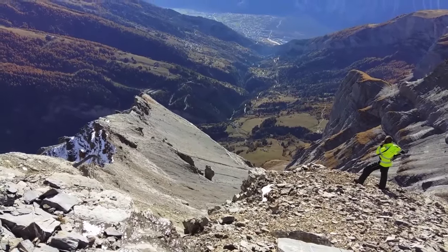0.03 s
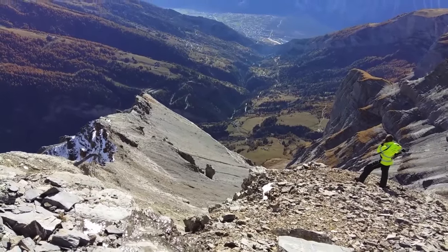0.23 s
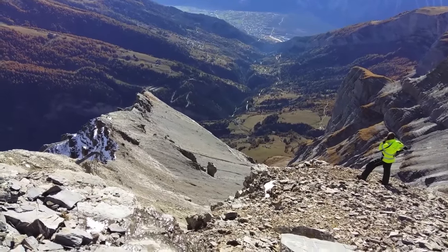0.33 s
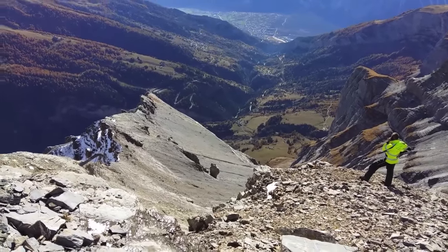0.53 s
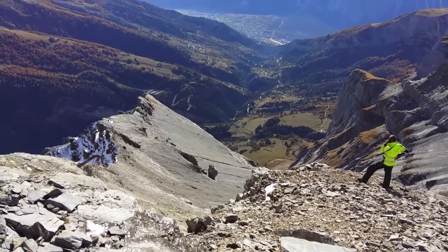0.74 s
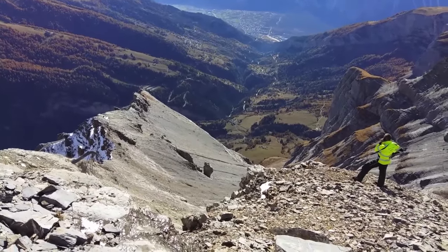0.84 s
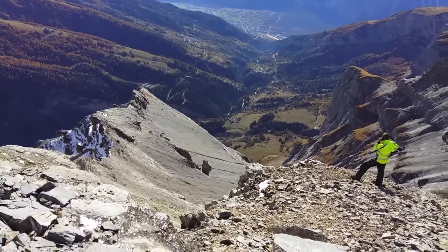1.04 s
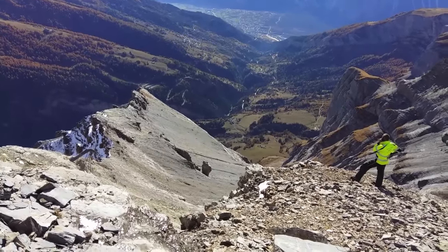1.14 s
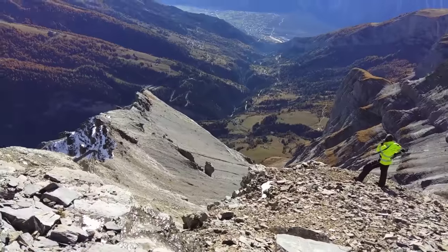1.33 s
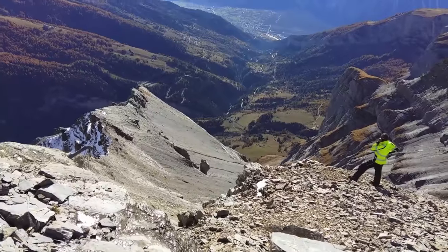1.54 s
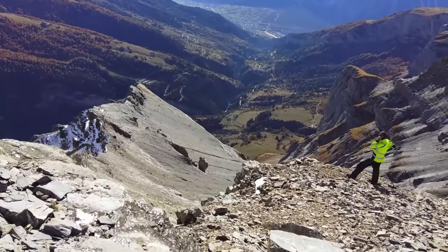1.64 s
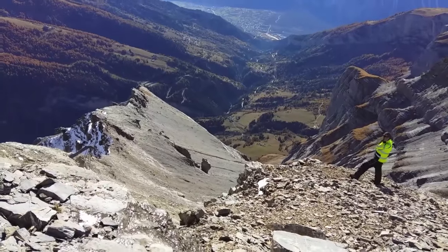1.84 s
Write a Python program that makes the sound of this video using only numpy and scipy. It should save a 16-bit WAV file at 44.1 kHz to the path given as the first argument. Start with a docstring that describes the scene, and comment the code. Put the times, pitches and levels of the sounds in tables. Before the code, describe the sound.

A sharp, overloading gas detonation cracks out, then a deep rumble rolls around a mountain valley

```python
"""Gas blast on a rocky ridge

Light wind and a thin whine are heard first and go on throughout, made from coloured noise and a sine.
A gas charge then detonates near a small camera: a short burst of flickering, crackling noise.
Slopes, gullies and cliffs scatter the wave back as a rolling rumble, hollow bursts and sharp single echoes.
The pressure jolts both microphones to their end stops, where they go nearly deaf for a while, the right one
for about a quarter second, leaving mostly the ring of the low-cut filter."""
import sys
import numpy as np
from scipy import signal
from scipy.fft import rfft, irfft, next_fast_len
from scipy.io import wavfile
from scipy.ndimage import uniform_filter1d

SR = 44100
rng = np.random.default_rng(int(sys.argv[2]) if len(sys.argv) > 2 else 0)


def unload_audio(sound):
    """Save the sound as a 16-bit wav file, at the path given as the first command line argument."""
    columns = np.transpose(np.atleast_2d(sound))
    # keep every value between -1 and 1, then stretch to whole-number steps
    steps = np.round(np.clip(columns, -1, 1) * 32767)
    wavfile.write(sys.argv[1], SR, steps.astype(np.int16))


N = 83790
T = np.arange(N) / SR  # time in s

# Tone colour of the wind: pitch_hz, relative level_db (per Hz)
WIND_SPECTRUM = [(25, 12.5), (50, 11.5), (90, 5), (200, -5.5), (400, -13.5), (1500, -24.5), (2250, -18.5),
                 (2800, -26), (6000, -44.5), (16000, -50)]
# Likeness of left and right, for the slopes and the wind: pitch_hz, likeness (1 = the same)
SIDE_LIKENESS = [(60, 0.99), (300, 1), (1000, 0.84), (3000, 0.15), (8000, 0.067)]
# Hollow returns from gullies: centre_s, pitch_hz, peak level_db
GULLIES = [(1.171, 760, -14.5), (1.205, 800, -24.5), (1.222, 820, -14.5), (1.244, 640, -16.5),
           (1.256, 570, -13.5), (1.272, 640, -21), (1.292, 720, -18), (1.31, 560, -22), (1.351, 560, -21.5)]
# Single echoes from cliffs: start_s, level_db, time_scale_ms (the push lasts four of these)
CLIFF_ECHOES = [(.274, -7, .2), (.2808, -14, .1), (.2845, -8, .1), (.293, -7, .2), (1.171, -8, .16),
                (1.2215, -15, .2), (1.244, -8, .2), (1.3495, -17, .16), (1.3565, -11, .21),
                (1.408, -6, .18), (1.4155, -10, .2), (1.418, -4, .18), (1.4565, -11, .18),
                (1.4593, -4, .22), (1.4655, -11, .22), (1.877, -22, .25)]
# Loudness of the waves from the slopes: time_s, boom_db, body_db, crackle_db, fizz_db
ROLL_LEVELS = [(.204, -20, -54, -42, -63), (0.258, -11, -14.5, -32.5, -29), (.32, -9.5, -20.5, -29, -38.5),
               (.41, -11, -26.5, -32.5, -39.5), (.47, -18.5, -31, -38.5, -51),
               (.51, -14.5, -31, -43, -51.5), (.54, -6.5, -25.5, -34.5, -48),
               (0.601, -21.5, -35, -45.5, -54.5), (.64, -10.5, -28.5, -37, -49),
               (.69, -17, -26, -36.5, -50.5), (0.749, -19.5, -26, -35, -45.5), (.83, -9, -23.5, -29.5, -43),
               (.86, -18, -26, -31, -52.5), (.89, -14.5, -27, -35, -50.5), (.905, -23, -34, -27, -49),
               (0.927, -22, -29.5, -34.5, -54), (.95, -22, -28, -33, -50), (0.984, -21, -34.5, -35, -62),
               (1.013, -15.5, -30.5, -36, -54), (1.032, -22, -38, -40.5, -61),
               (1.048, -20.5, -29.5, -35, -55), (1.068, -21, -33.5, -38.5, -63.5),
               (1.108, -21.5, -27, -37, -55), (1.124, -22, -26, -33, -54),
               (1.141, -10.5, -26.5, -36.5, -60.5), (1.176, -35, -27, -33, -53.5),
               (1.19, -23.5, -25.5, -35, -63.5), (1.251, -29, -27, -32.5, -63.5),
               (1.275, -22.5, -25.5, -40, -61), (1.298, -31.5, -24.5, -37.5, -67),
               (1.322, -26.5, -32.5, -44, -74), (1.343, -31, -34, -42, -72),
               (1.355, -22.5, -25, -33, -75.5), (1.39, -21, -23.5, -34, -61), (1.413, -15.5, -25, -30, -65),
               (1.447, -23, -29.5, -43.5, -61), (1.456, -11.5, -23.5, -26, -69.5),
               (1.489, -21, -26, -41.5, -83), (1.566, -27, -34.5, -46.5, -91),
               (1.674, -30, -37.5, -57.5, -85), (1.77, -34, -42.5, -59, -94),
               (1.867, -28.5, -44, -66, -100), (1.881, -28.5, -34.5, -47, -93)]
# Tone colours of the four bands of the roll, low to high: pitch_hz, relative level_db (per Hz)
BOOM_SPECTRUM = [(18, 3), (27, 23), (36, 30), (50, 17), (75, 5), (120, 1.5), (200, -1.5), (260, -6.5),
                 (340, -21), (430, -36.5), (800, -99)]
BODY_SPECTRUM = [(150, -26), (300, -2.5), (420, -3.5), (600, -0.5), (800, -5), (1100, -12), (1500, -16),
                 (2500, -89)]
CRACKLE_SPECTRUM = [(600, -23), (1100, -9.5), (1600, 1.5), (2050, -3), (2300, -9.5), (3200, -21),
                    (4500, -35.5), (7000, -75.5)]
FIZZ_SPECTRUM = [(2500, -10), (4200, -10.5), (5500, -11.5), (7000, -23.5), (9000, -33.5), (14000, -49)]
# Tone colour of the direct blast: pitch_hz, relative level_db (per Hz)
BLAST_SPECTRUM = [(100, -77), (300, -4), (600, 5.5), (1000, 2), (1500, -3.5), (2200, -8), (3200, -17.5),
                  (6000, -27), (16500, -22.5)]
# Resonance of each microphone port, left then right: pitch_hz, width_hz, boost_db
PORTS = [(1900, 900, 6), (4000, 1500, 4)]
# Microphone overloads: deaf_from_s, deaf_until_s, jolt_s, jolt_size (signed, before the low cut)
LEFT_STOPS = [(.2145, .217, .2108, 1.07), (.2283, .2312, .222, -1.25), (.2347, .239, .2293, -1.6),
              (.2435, .274, .2399, -1.5), (.278, .2805, .274, .8), (.282, .284, .281, .35),
              (.2975, .3015, .2955, .7), (.3315, .335, .3275, .8), (.386, .39, .3815, .7),
              (.4175, .431, .414, 1.2), (.447, .456, .4423, .5), (.552, .557, .5481, .35),
              (.5875, .59, .58, .9), (.6, .607, .5935, 1.1), (.702, .708, .6972, -.6),
              (.716, .718, .711, .9), (.761, .773, .7555, .6), (.789, .798, .7818, 1.1),
              (.803, .805, .8007, .7), (.823, .826, .8171, 1), (1.138, 1.141, 1.136, .4)]
RIGHT_STOPS = [(.2052, .2115, .2038, -1.65), (.2155, .218, .2124, 1), (.229, .231, .2273, 1.7),
               (.2355, .239, .2336, .5), (.241, .4225, .2396, -1.9), (.4232, .503, .4216, .65),
               (.552, .557, .5478, .25), (.5875, .59, .58, .8), (.6, .607, .5932, 1),
               (.702, .708, .697, -.65), (.716, .718, .7106, .9), (.761, .773, .7551, .65),
               (.789, .798, .7816, 1.05), (.803, .805, .8003, .75), (.823, .826, .8169, 1),
               (1.138, 1.141, 1.136, .4)]

WIND_DB, WHINE_DB, WHINE_HZ = -57, -62, 1662
LAG_S = 0.00028  # the left microphone hears the slopes later
LATE_T = T - np.array([[LAG_S], [0]])  # time in s as each side hears it
GULLY_HALF_S = 0.0042  # from the centre of a return to where it has sunk to 1/e
SNAP_S, SNAP_DB, SNAP_LENGTH_S = 0.3078, 4.5, 0.00044  # one bright snap among the echoes
RETURNS_PER_S, SIZE_SPREAD_DB = 6000, 2.5  # small reflectors answering on each side
PATCH_DB = 1  # unevenness of the slopes over time and pitch
BLAST_S, BLAST_LENGTH_S, BLAST_DB = 0.2038, 0.039, 2
BLAST_FLICKER_DB, BLAST_FADE_DB_PER_S = 6, 3000  # the fade begins after the burst
LEFT_DB = 0.35  # left is raised by this, right lowered by it
PREAMP_TOP, CEILING = 0.68, 1.0  # largest amplitudes
JOLT_RISE_S = 0.002
CREEP_HZ = 55  # slow pressure below this outlasts short stops
LEAK_DB, LEAK_FADE_DB_PER_S = -14, 850  # what still passes at a stop
SEEP_DB, SEEP_FADE_DB_PER_S = -30, 300  # a fainter remainder that lasts longer
LOWCUT_HZ, DULL_HZ, TOP_HZ = 72, 6550, 16900


def amp(db):
    """Turn decibels into an amplitude factor."""
    return 10 ** (np.asarray(db) / 20)


def along(points, hz):
    """Read a curve of (Hz, value) points on a log pitch axis."""
    point_hz, values = np.transpose(points)
    return np.interp(np.log(hz + 1), np.log(point_hz + 1), values)


def filtered(x, response):
    """Change each pitch of x by a response, which may also shift its timing."""
    length = next_fast_len(N + SR // 2)
    hz = np.fft.rfftfreq(length, 1 / SR)
    return irfft(rfft(x, length) * response(hz), length)[..., :N]


def lowcut(x):
    """The camera's steep filter removes low pitches and rings after a jolt."""
    sos = signal.butter(6, LOWCUT_HZ, "high", fs=SR, output="sos")
    return signal.sosfilt(sos, x)


def spread(pair, spectrum, lag_s):
    """Colour two sources and mix them to left and right, with rms 1 after the low cut."""
    def colour_and_share(hz):
        turn = np.arccos(np.clip(along(SIDE_LIKENESS, hz), -1, 1)) / 2
        return amp(along(spectrum, hz)) * [np.cos(turn), np.sin(turn)]

    def side_delay(hz):
        # half the lag delays the left, half advances the right
        return np.exp(-1j * np.pi * hz * lag_s * np.array([[1], [-1]]))

    common, opposite = filtered(pair, colour_and_share)
    both = filtered(np.array([common + opposite, common - opposite]), side_delay)
    return both / np.sqrt(np.mean(lowcut(both) ** 2))


def wind():
    """Light wind is steady noise, coloured and partly shared by the two sides."""
    return amp(WIND_DB) * spread(rng.standard_normal((2, N)), WIND_SPECTRUM, 0)


def whine():
    """A thin steady whine is one sine, weaker and upside down on the right."""
    tone = np.sqrt(2) * np.sin(2 * np.pi * WHINE_HZ * T)
    return amp(WHINE_DB) * tone * np.array([[1], [-0.3]])


def gullies():
    """Each gully answers with a short hollow burst of a few waves."""
    out = np.zeros((2, N))
    for centre_s, hz, db in GULLIES:
        phase = rng.uniform(0, 2 * np.pi)
        swell = np.exp(-((LATE_T - centre_s) / GULLY_HALF_S) ** 2)
        out += amp(db) * swell * np.sin(2 * np.pi * hz * LATE_T + phase)
    return out


def cliff_echoes():
    """Each cliff sends back one pressure wave, rounded by distance: a push and a pull."""
    out = np.zeros((2, N))
    for start_s, db, scale_ms in CLIFF_ECHOES:
        u = np.clip((LATE_T - start_s) / (scale_ms / 1000), 0, 60)
        out += amp(db) * u ** 3 * (1 - u / 4) * np.exp(1 - u)
    return out


def snap():
    """One bright snap is a single square push and pull, the same on both sides."""
    during = (T > SNAP_S) & (T < SNAP_S + SNAP_LENGTH_S)
    return amp(SNAP_DB) * during * np.sign(np.sin(2 * np.pi * (T - SNAP_S) / SNAP_LENGTH_S))


def reflectors():
    """Thousands of small reflectors of scattered size answer as clicks, in uneven patches."""
    struck = rng.random((2, N)) < RETURNS_PER_S / SR
    sizes = rng.standard_normal((2, N)) * amp(SIZE_SPREAD_DB * rng.standard_normal((2, N)))
    grid = signal.stft(struck * sizes, nperseg=512)[2]
    # random patches over pitch and time, shared by both sides
    patches = uniform_filter1d(rng.standard_normal(grid.shape[1:]), size=6, axis=0)
    patches = uniform_filter1d(patches, size=5, axis=1)
    uneven = grid * amp(PATCH_DB * patches / patches.std())
    return signal.istft(uneven, nperseg=512)[1][:, :N]


def roll():
    """Slopes scatter the wave into a rumble whose four bands swell on their own."""
    times_s, *band_levels = np.transpose(ROLL_LEVELS)
    spectra = (BOOM_SPECTRUM, BODY_SPECTRUM, CRACKLE_SPECTRUM, FIZZ_SPECTRUM)
    source = reflectors()
    out = np.zeros((2, N))
    for levels_db, spectrum in zip(band_levels, spectra):
        out += amp(np.interp(T, times_s, levels_db)) * spread(source, spectrum, LAG_S)
    return out * (T > BLAST_S)


def blast():
    """The blast is a flickering crackle, unlike on the two sides, far too loud for the preamplifier."""
    crackle = filtered(rng.standard_normal((2, N)), lambda hz: amp(along(BLAST_SPECTRUM, hz)))
    flicker = uniform_filter1d(rng.standard_normal(N), size=90)
    flicker_db = BLAST_FLICKER_DB * flicker / flicker.std()
    fade_db = BLAST_FADE_DB_PER_S * np.clip(T - BLAST_S - BLAST_LENGTH_S, 0, None)
    level = amp(BLAST_DB + flicker_db - fade_db)
    return level * crackle / crackle.std() * (T > BLAST_S)


def scene():
    """Add up all the sound that reaches the microphones."""
    return wind() + whine() + gullies() + cliff_echoes() + snap() + roll() + blast()


def overloaded(x, stops):
    """The preamplifier squares off peaks; the jolted diaphragm barely follows while on its stop."""
    creep = filtered(x, lambda hz: 1 / (1 + (hz / CREEP_HZ) ** 8))
    quick = PREAMP_TOP * np.tanh((x - creep) / PREAMP_TOP)
    freedom = np.ones(N)  # 1 = the diaphragm follows fully
    jolts = np.zeros(N)
    for from_s, until_s, jolt_s, size in stops:
        since = np.abs(T - from_s)
        leak = amp(LEAK_DB - LEAK_FADE_DB_PER_S * since)
        seep = amp(SEEP_DB - SEEP_FADE_DB_PER_S * since)
        freedom = np.where((T > from_s) & (T < until_s), leak + seep, freedom)
        rise = np.clip((T - jolt_s) / JOLT_RISE_S, 0, 1)
        jolts += size * np.sin(np.pi / 2 * rise) ** 2
    # the slow pressure feels only a smoothed version of the stops
    awake = uniform_filter1d(freedom * (T > BLAST_S), size=1500)
    awake = uniform_filter1d(awake, size=1500)
    # each small movement is scaled, so the diaphragm goes on from where it rests
    followed = np.cumsum(np.diff(quick, prepend=0) * freedom)
    return awake * creep + followed + jolts


def port_colour(hz):
    """The opening before each microphone boosts the pitches around its resonance."""
    responses = []
    for centre_hz, width_hz, db in PORTS:
        damping = 1j * hz * width_hz
        resonance = damping / (centre_hz ** 2 - hz ** 2 + damping)
        responses.append(1 + (amp(db) - 1) * resonance)
    return np.array(responses)


def treble_limit(hz):
    """Treble is gently dulled, then falls to nothing at the top edge."""
    edge = np.clip((TOP_HZ - hz) / 800, 0, 1) ** 2
    return edge / (1 + 1j * hz / DULL_HZ)


def record(dry):
    """The camera adds port colour, overload, low cut, a soft ceiling and a treble limit."""
    left, right = filtered(dry, port_colour) * amp([[LEFT_DB], [-LEFT_DB]])
    cut = lowcut(np.array([overloaded(left, LEFT_STOPS), overloaded(right, RIGHT_STOPS)]))
    held = cut / (1 + np.abs(cut / CEILING) ** 6) ** (1 / 6)
    return filtered(held, treble_limit)


dry = scene()
out = record(dry)
unload_audio(out)
```